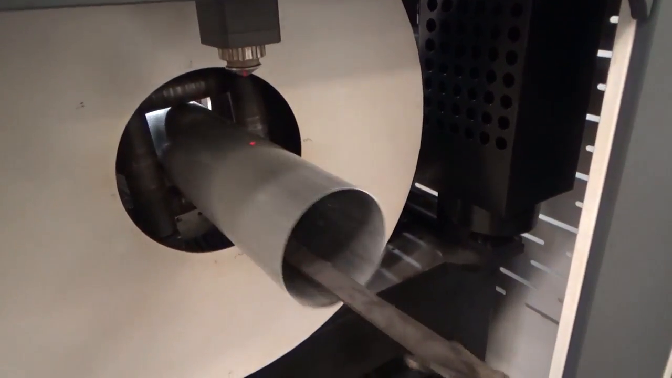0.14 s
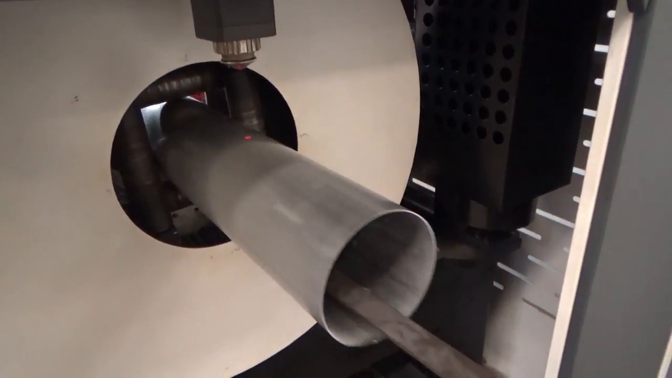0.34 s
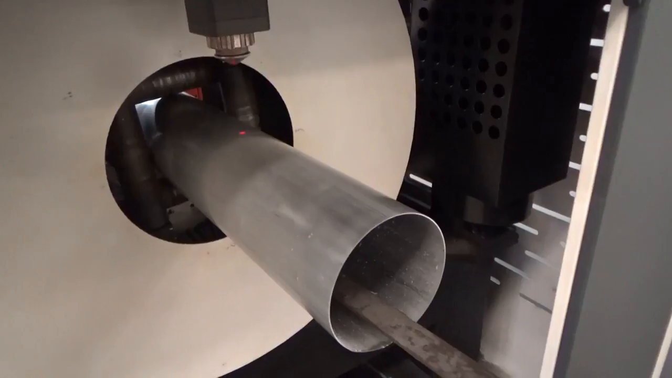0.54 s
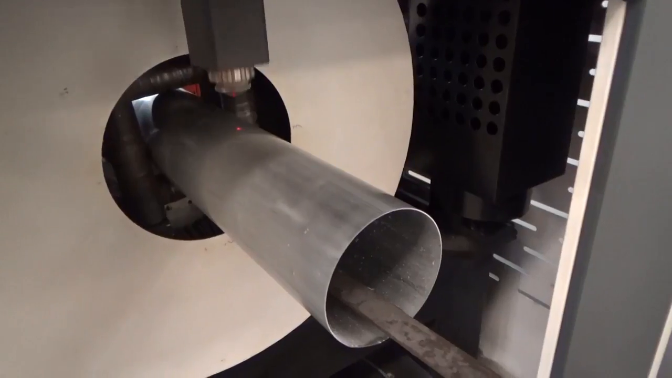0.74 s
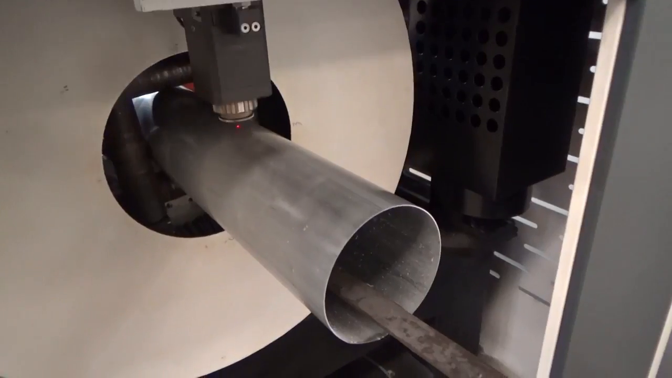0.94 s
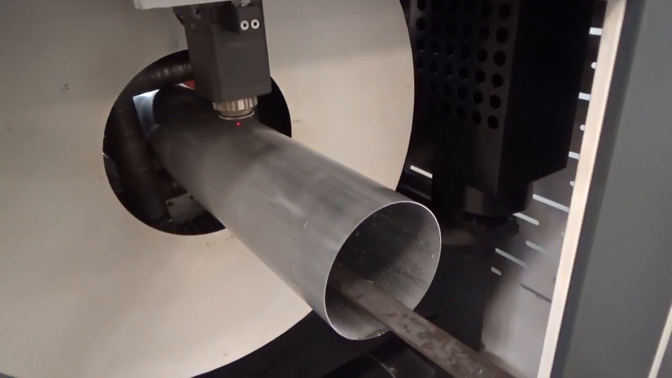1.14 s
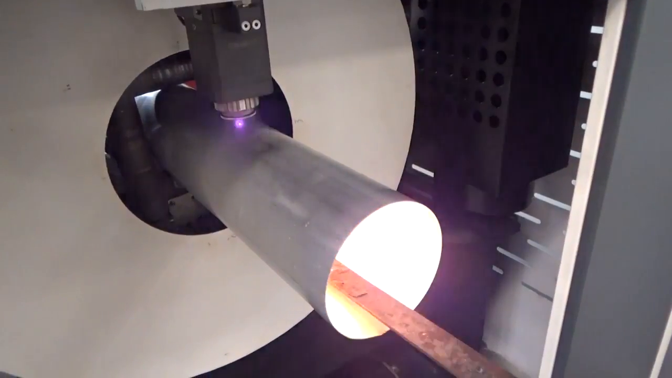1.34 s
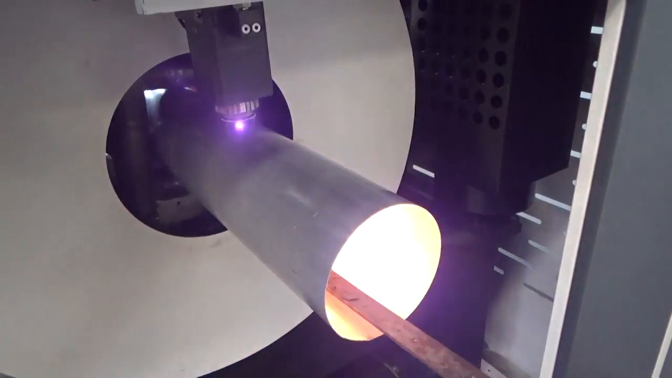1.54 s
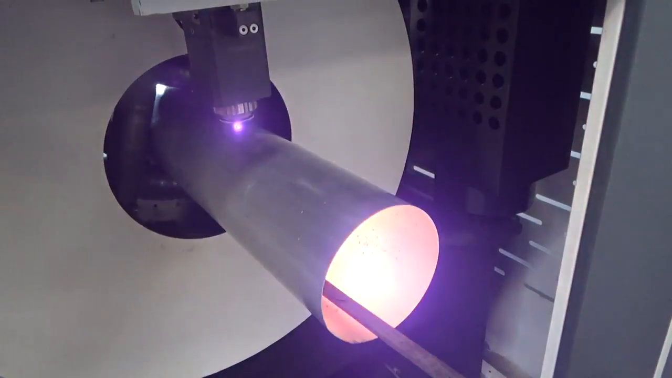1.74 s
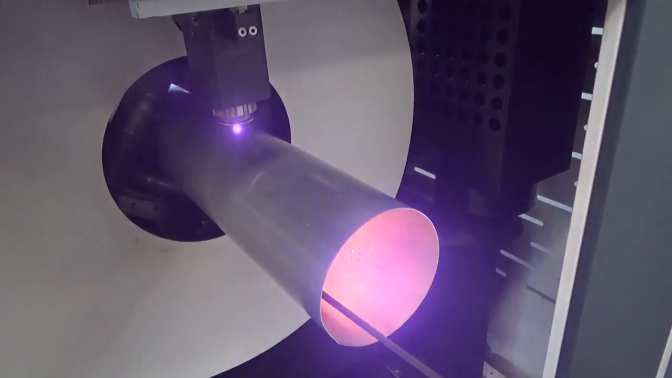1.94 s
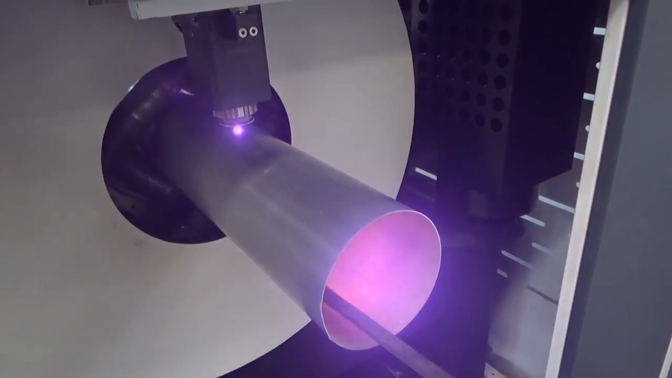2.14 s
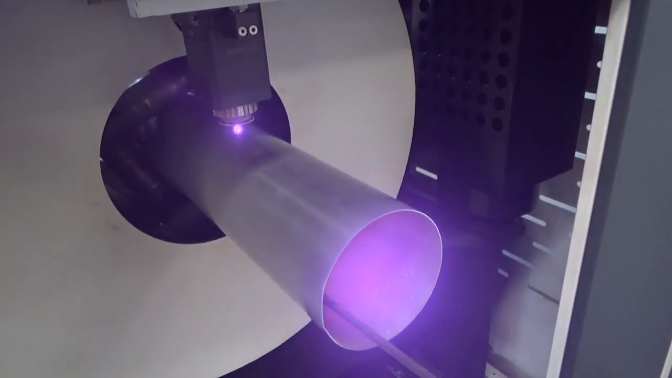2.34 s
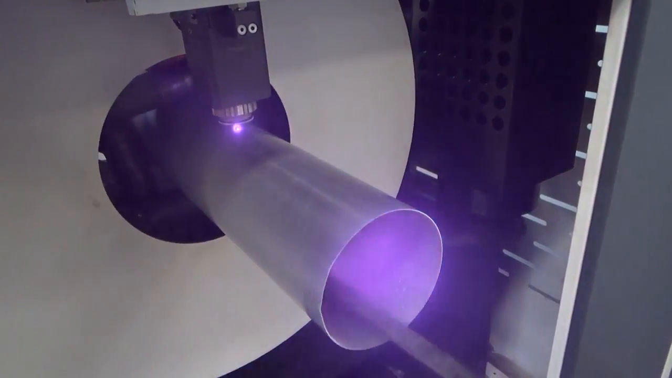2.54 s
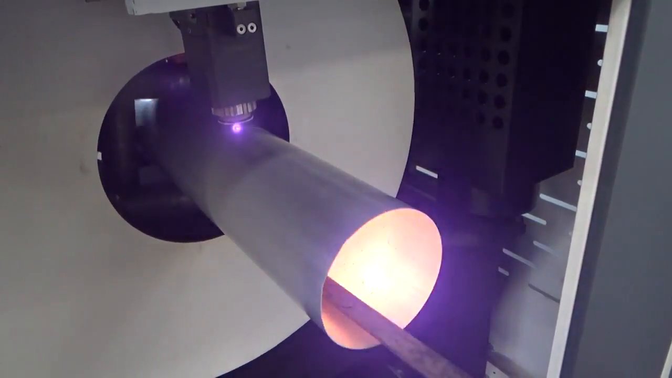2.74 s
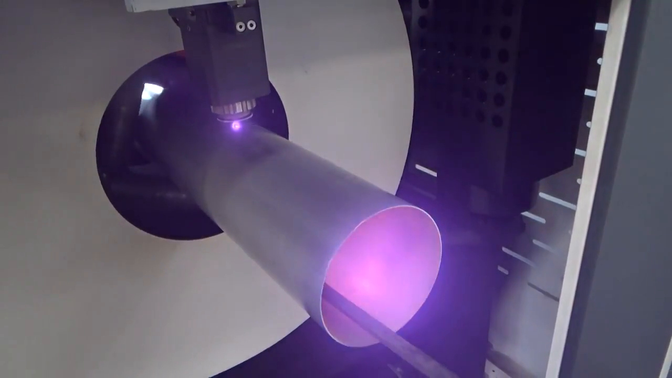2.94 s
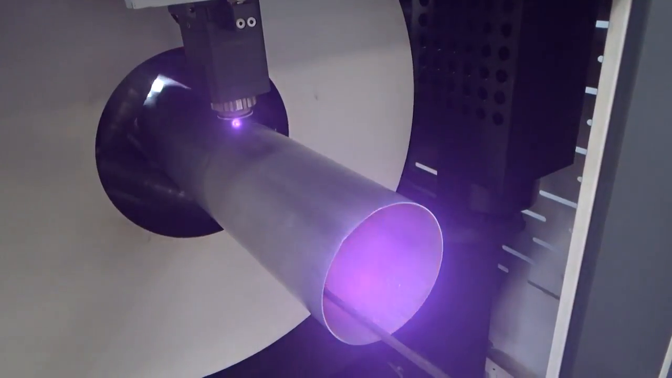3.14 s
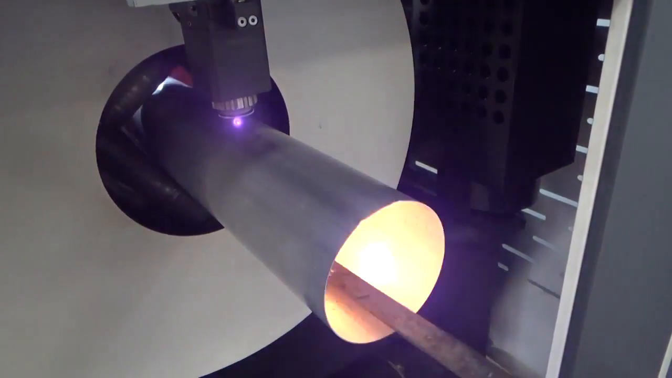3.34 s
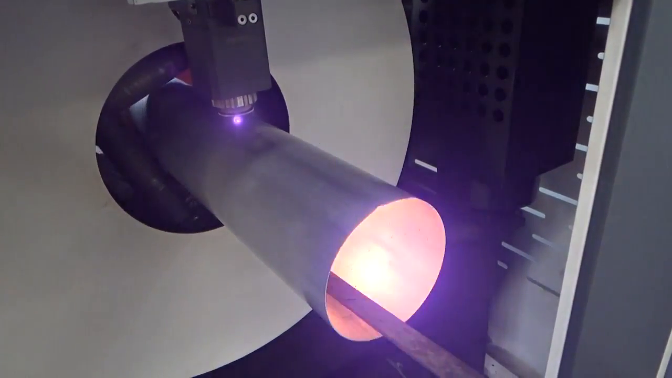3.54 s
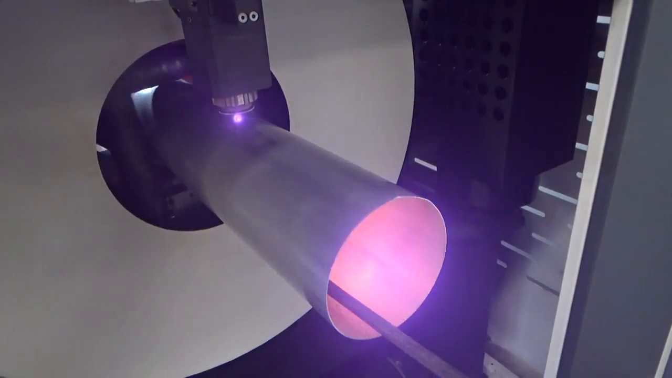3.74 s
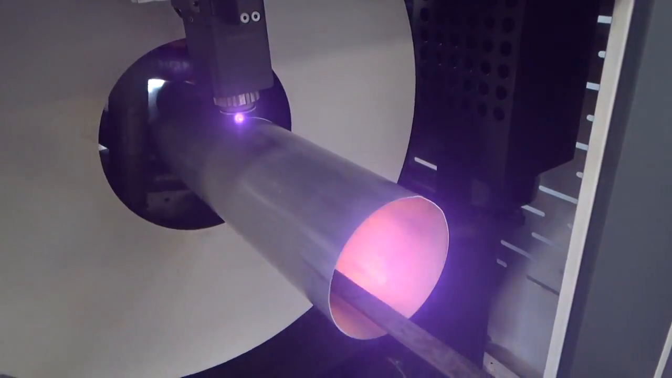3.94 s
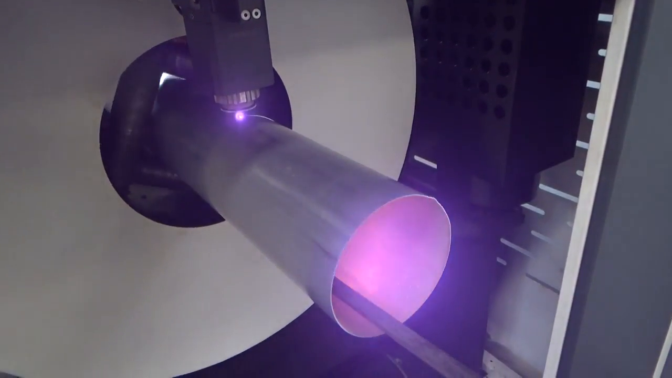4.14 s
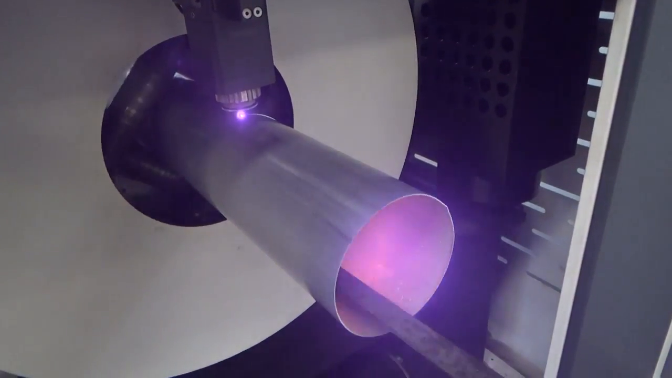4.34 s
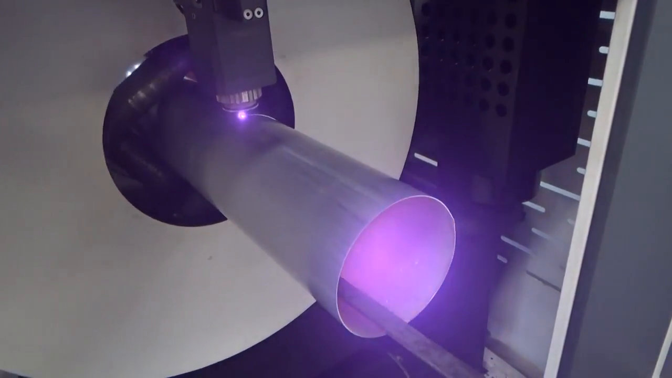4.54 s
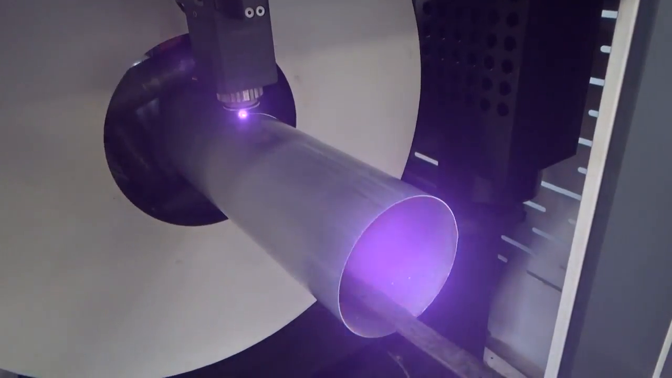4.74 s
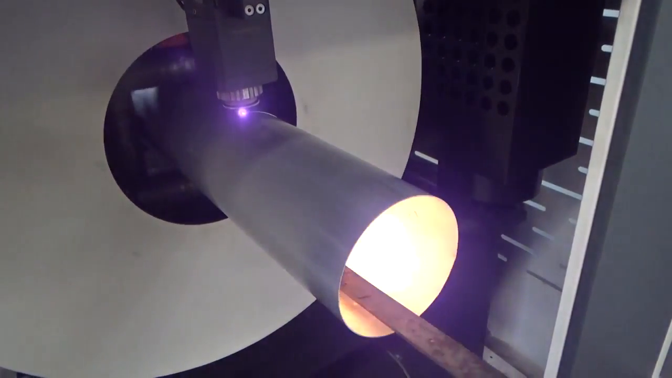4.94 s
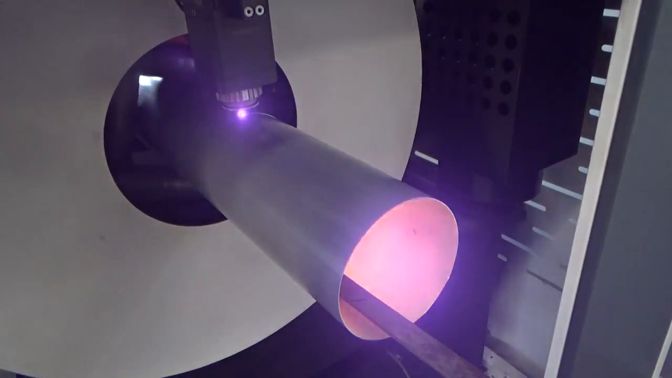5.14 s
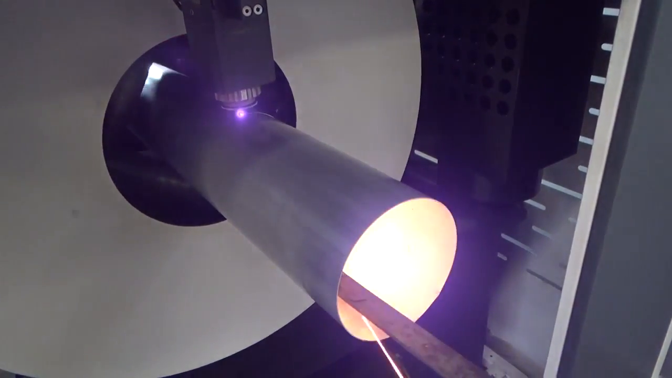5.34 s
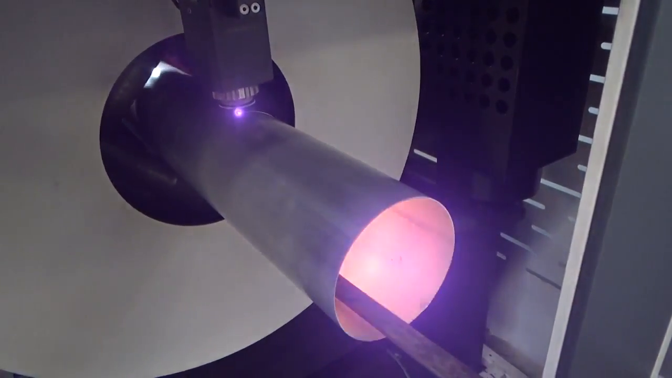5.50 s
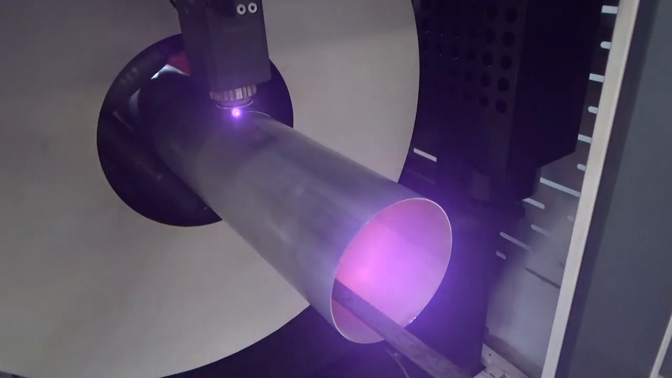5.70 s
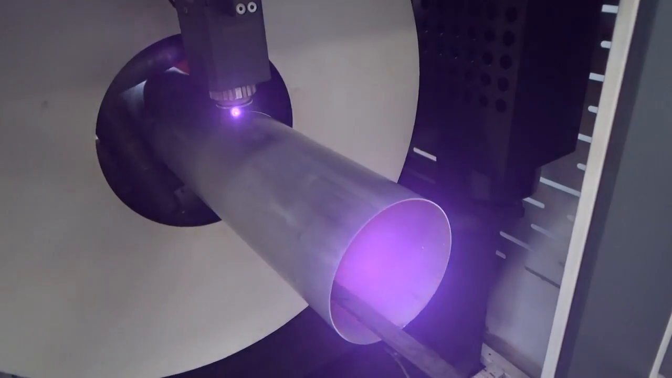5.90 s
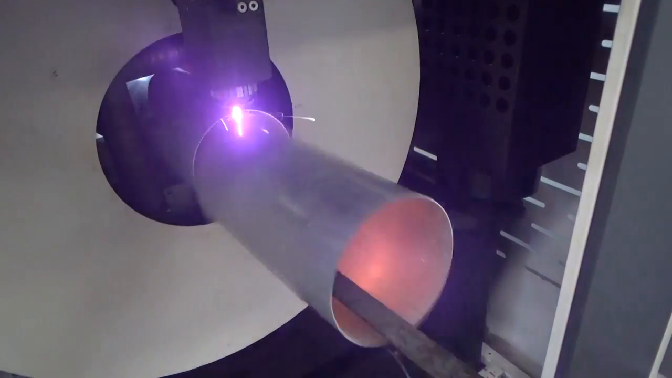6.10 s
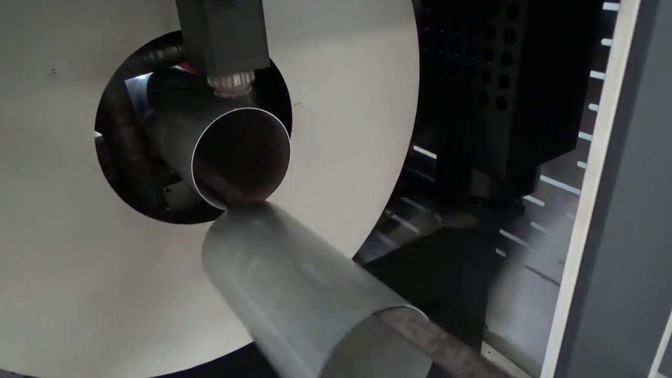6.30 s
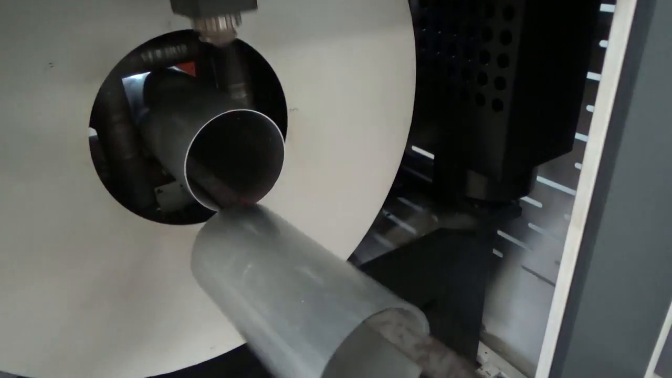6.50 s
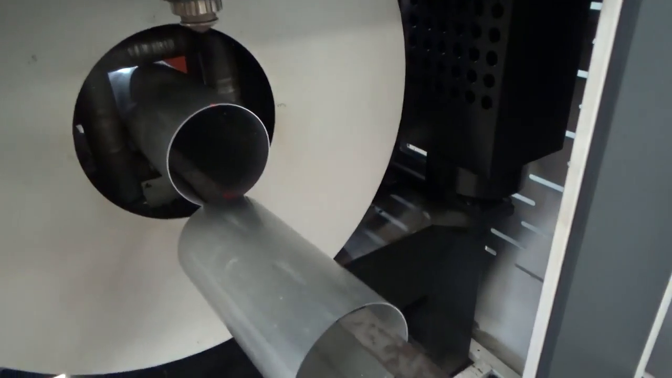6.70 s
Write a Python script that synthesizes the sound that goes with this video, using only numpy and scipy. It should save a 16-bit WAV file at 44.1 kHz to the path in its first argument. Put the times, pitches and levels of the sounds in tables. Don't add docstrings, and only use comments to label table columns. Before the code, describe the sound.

A close stereo pickup of a metal-tube cutter in a workshop. From 0 to 0.45 s, fans rumble with an unsteady low blade hum, while thin valve air, dull thumps and a faint high servo whine sound. At about 0.47 s a sharp puff and brief falling whistle lead into a hollow, resonant roar of clamp air lasting until about 1.05 s, with another puff and heavier knocks around 0.8-0.9 s. At 1.05 s the cutting gas bursts in: a bright, dense, steady hiss, finely sputtering, nearly constant to 6.1 s, the room pushed far down. Tiny squeaks near 1.5 s are almost buried. Around 6.2 s a gust and small metallic knocks mark the piece dropping and rattling. From 6.45 s airy whistles glide downward, then the gas blows across the open tube with breathy, hollow resonances until about 6.9 s.

```python
import sys
import numpy as np
from scipy import signal
from scipy.fft import rfft, irfft, next_fast_len
from scipy.io import wavfile
from scipy.ndimage import uniform_filter1d, map_coordinates

SR = 44100
rng = np.random.default_rng(int(sys.argv[2]) if len(sys.argv) > 2 else 0)


def gain_from_decibels(decibels):
    exponent = np.asarray(decibels, float) / 20
    return 10 ** exponent


def transcribe(signal):
    frames = np.atleast_2d(signal).T
    limited = np.clip(frames, -1, 1)
    pcm = np.round(limited * 32767).astype(np.int16)
    wavfile.write(sys.argv[1], SR, pcm)


N = 302526


# time_s, level_db
JET_PRESSURE = [
    (1.05, -38),
    (1.11, -20),
    (1.3, -20),
    (2.9, -20),
    (6.1, -20),
    (6.278, -19.5),
    (6.484, -19.5),
    (6.724, -27),
    (6.86, -25.5),
]
# freq_hz, level_db (per Hz)
GAS_SPECTRUM = [(290, -32), (500, -31), (658, -30.5), (771, -27.5), (891, -29), (1460, -28), (3270, -19.5),
                (4050, -19.5), (6620, -12), (7220, -12), (10200, -1), (14400, -9.5), (15800, -14)]
# freq_hz, likeness (0-1)
NEAR_LIKENESS = [(500, 1), (1500, 1), (5000, 1), (7500, .96), (10000, 0.99), (15000, 0.99)]
# freq_hz, left_over_right_db
NOZZLE_LEAN = [(5500, -2.5), (7500, 2), (10500, 3), (13000, 1.5), (15500, 1)]


def gas_jet():
    swells_db = 0.038 * wobble(5.32) + 0.15 * wobble(22.08)
    sputter_db = 0.38 * wobble(300) + 0.43 * wobble(1500)
    flicker = gain_from_decibels(swells_db + sputter_db)
    hiss = rush(shaped(GAS_SPECTRUM), NEAR_LIKENESS, (9000, 13000), patchy_db=0.0, lean=NOZZLE_LEAN)
    pressure, = gains(JET_PRESSURE)
    return pressure * flicker * hiss / np.sqrt(np.mean(flicker ** 2))


# start_s, level_db, held_s, drift_db_per_s
EXHAUST_BURSTS = [(.495, -20, 0.565, -1.4)]
# start_s, level_db, held_s, drift_db_per_s
LAST_BREATH_BURSTS = [(1.15, -48.5, 0.58, -5)]
# freq_hz, level_db (per Hz)
ROAR_SPECTRUM = [(240, -44), (400, -23), (674, -7.5), (808, -2), (915, -8), (1110, -3), (1540, -1.5),
                 (1670, 0.5), (6000, -21), (7800, -54), (13200, -120)]
# freq_hz, width_hz, level_db
FRAME_MODES = [(469, 19, 10.5), (673, 33, 6), (807, 30, 1), (928, 28, 6), (1167, 23, 0.5), (1267, 23, 0.5),
               (1442, 21, 1), (1664, 30, -14), (1810, 38, -7), (2150, 91, -8), (2430, 60, -2),
               (2990, 61, -3)]
# freq_hz, likeness (0-1)
FAR_LIKENESS = [(60, 0.95), (130, 0.96), (300, 0.91), (700, 0.64), (3000, 0.74), (7000, 0.7), (9500, 0.97),
                (11000, 1)]


def clamp_exhaust():
    escaping = bursts(EXHAUST_BURSTS, rise_db_s=450, fall_db_s=344)
    escaping += bursts(LAST_BREATH_BURSTS, rise_db_s=304, fall_db_s=55)

    def frame(hz):
        return gain_from_decibels(along(ROAR_SPECTRUM, hz)) * ringing(FRAME_MODES, hz, base_db=-6.0)

    return escaping * rush(frame, FAR_LIKENESS, (700, 3000), patchy_db=-0.2)


# start_s, level_db, held_s, drift_db_per_s
STROKE_BURSTS = [
    (.5, -27.5, 0.23, -18),
    (.91, -30.5, 0.14, 31),
]
# freq_hz, level_db (per Hz)
STROKE_SPECTRUM = [(1500, -14), (2800, 1), (4000, -4.5), (6500, -3), (10000, -9.5), (15000, -46)]


def clamp_strokes():
    moving = bursts(STROKE_BURSTS, rise_db_s=350, fall_db_s=162)
    return moving * rush(shaped(STROKE_SPECTRUM), FAR_LIKENESS, (3500, 6500), patchy_db=0.4)


# start_s, level_db, held_s, drift_db_per_s
VALVE_PUFFS = [(0, -34.5, 0.016, -60), (.235, -43, 0.057, 20), (.462, -23.5, 0.18, -94),
               (.882, -23, 0.22, -20)]
# start_s, level_db, held_s, drift_db_per_s
VALVE_LEAKS = [(0, -34, 0.416, 0), (.6, -36.5, 0.25, 0.17)]
# freq_hz, level_db (per Hz)
VALVE_SPECTRUM = [(2940, -33), (5000, -21), (6510, -6), (8560, -0.5), (9890, -1), (10900, -4.5),
                  (12200, -8), (15000, -17), (15800, -22)]


def valve():
    flow = bursts(VALVE_PUFFS, rise_db_s=900, fall_db_s=470)
    flow += bursts(VALVE_LEAKS, rise_db_s=100, fall_db_s=400)
    return flow * rush(shaped(VALVE_SPECTRUM), FAR_LIKENESS, (7500, 12000), patchy_db=0.2)


# start_s, peak_db, pitch_hz, t60_s
SEATING_THUMPS = [(0, -20, 611, 0.25), (.2, -23, 450, 0.17), (.425, -26, 230, 0.23), (.79, -27, 201, .2),
                  (.815, -21, 179, 0.22), (.825, -15, 341, .2)]


def thumps():
    return taps(SEATING_THUMPS, attack_s=0.0088)


# start_s, level_db, held_s, drift_db_per_s
RATTLE_BURSTS = [(6.222, -36.5, 0.22, -31)]
# freq_hz, level_db (per Hz)
RATTLE_SPECTRUM = [(150, -40), (250, -12), (431, -10), (519, 1), (1490, -5.5), (1960, -4), (2770, -10),
                   (3520, -8), (6000, -19), (7800, -38), (13200, -120)]
# freq_hz, width_hz, level_db
SHELL_MODES = [(720, 100, -9), (1330, 31, 0), (1760, 33, -3), (2000, 38, 2), (2410, 120, -4), (3070, 29, 1),
               (3570, 130, 2), (4130, 52, -1), (4200, 170, 0)]
# freq_hz, likeness (0-1)
BELOW_LIKENESS = [(400, 0.95), (1200, 0.92), (2500, .99)]
# start_s, peak_db, pitch_hz, t60_s
PIECE_KNOCKS = [(6.202, -28, 2870, .09), (6.212, -34, 2440, .06), (6.248, -30, 1330, 0.1),
                (6.279, -28, 3570, 0.13), (6.278, -28, 4370, .07), (6.285, -35, 2010, 0.16),
                (6.312, -33, 3070, 0.3), (6.335, -35, 3580, 0.098)]


def falling_piece():
    def shell(hz):
        return gain_from_decibels(along(RATTLE_SPECTRUM, hz)) * ringing(SHELL_MODES, hz, base_db=-7.0)

    shaking = bursts(RATTLE_BURSTS, rise_db_s=700, fall_db_s=88)
    rattle = shaking * rush(shell, BELOW_LIKENESS, (400, 1500), patchy_db=0.1)
    return rattle + taps(PIECE_KNOCKS, attack_s=0.0011)


# start_s, level_db, held_s, drift_db_per_s
PIPE_BURSTS = [(6.67, -25, .2, 4)]
# freq_hz, width_hz, level_db
PIPE_MODES = [(1036, 15, -4), (1237, 18, -5), (1410, 54, -8), (1613, 30, -6), (1820, 19, -2),
              (2000, 58, -11), (2170, 20, -4), (2395, 54, -2.5), (2650, 68, -2.5), (3050, 66, -0.5),
              (3230, 63, -1.5), (3400, 62, -0.5), (3740, 32, -2), (4060, 86, -2), (4370, 120, -1.5),
              (4610, 19, 3.5), (4930, 29, -1), (5330, 31, -7), (5750, 120, -6), (6150, 36, -4),
              (6570, 34, 1)]
# start_s, level_db, held_s, drift_db_per_s
RIM_BURSTS = [(6.544, -25.5, 0.38, -9)]
# freq_hz, level_db (per Hz)
RIM_SPECTRUM = [(3500, -36), (5500, -1.5), (7000, 1), (9000, 2), (12000, 0), (15500, -36)]
# freq_hz, likeness (0-1)
TUBE_LIKENESS = [(1000, .97), (3000, 0.98), (5000, 0.91), (8000, 0.93), (12000, .98)]


def blown_tube():
    def column(hz):
        below_pipe = 1 + (900 / (hz + 1)) ** 6
        above_pipe = 1 + (hz / 7200) ** 6
        return ringing(PIPE_MODES, hz, base_db=-19) / below_pipe / above_pipe

    pipe = bursts(PIPE_BURSTS, rise_db_s=48, fall_db_s=55)
    rim = bursts(RIM_BURSTS, rise_db_s=170, fall_db_s=55)
    return (pipe * rush(column, TUBE_LIKENESS, (1500, 4500), patchy_db=-1.0)
            + rim * rush(shaped(RIM_SPECTRUM), TUBE_LIKENESS, (5500, 8000), patchy_db=0.0))


# loudest_s, level_db, centre_hz, glide_octaves_per_s, fade_s
GAP_WHISTLES = [(6.47, -15.5, 11700, -1, 0.12), (6.49, -17, 9500, -0.19, 0.33),
                (6.51, -25, 12900, -1.1, .1), (6.53, -27, 7360, -1.3, 0.11), (6.57, -27.5, 6100, -0.47, .2),
                (.468, -18, 8700, -2, .035), (6.6, -32, 3400, -.4, 0.65)]
# loudest_s, level_db, centre_hz, glide_octaves_per_s, fade_s
PORT_CLOSING = [(1.082, -26, 5600, -1, .03)]
# loudest_s, level_db, centre_hz, glide_octaves_per_s, fade_s
BROAD_GUSTS = [(6.195, -23, 6700, -4, .05), (6.7, -31, 5500, -.4, .03), (6.225, -40, 1300, -4, 0.27),
               (.62, -22.5, 2800, 1.5, 0.23)]


def whistles():
    hz, t, noise = signal.stft(rng.standard_normal((2, N + 512)), SR, nperseg=256)
    hz = hz[:, None]
    power = 0
    for rows, breadth, rise_share in [([*GAP_WHISTLES, *PORT_CLOSING], .1, .45), (BROAD_GUSTS, .7, .4)]:
        for loudest_s, db, middle_hz, glide, fade_s in rows:
            u = (t - loudest_s) / fade_s
            centre = middle_hz * 2 ** (glide * fade_s * np.clip(u, -1, 1))
            width = breadth * centre
            level = gain_from_decibels(db - 17.5 * np.maximum(u, -u / rise_share))
            band = 1 / (1 + (2 * (hz - centre) / width) ** 2) ** 2
            band = band / (1 + (0.29 * centre / (hz + 1)) ** 4)
            power = power + level ** 2 * SR / (np.pi * width) * band
    mid, side = signal.istft(noise * np.sqrt(power), SR, nperseg=256)[1][:, :N]
    return np.array([1.2 * mid + .15 * side, 1.1 * mid - 0.14 * side])


# start_s, peak_db, pitch_hz, t60_s
CHUCK_SQUEAKS = [(1.468, -38, 803, .16), (1.536, -35, 780, 0.088), (1.613, -34, 775, .07)]
# start_s, level_db, held_s, drift_db_per_s
CHUCK_TURNING = [(2.55, -59, 0.77, -10), (3.55, -65, .3, 0), (5.5, -61, .3, 0)]


def chuck():
    motor = bursts(CHUCK_TURNING, rise_db_s=60, fall_db_s=50) * tone(757, drift=0.0062, flutter_db=3.5)
    return motor + taps(CHUCK_SQUEAKS, attack_s=0.0043)


# start_s, level_db, held_s, drift_db_per_s
SERVO_MOVING = [(.2, -46, .1, 20), (.35, -46, .14, 15)]
# start_s, level_db, held_s, drift_db_per_s
SERVO_HOLDING = [(.55, -53, 0.305, -3)]


def servo():
    moving = bursts(SERVO_MOVING, rise_db_s=280, fall_db_s=200)
    holding = bursts(SERVO_HOLDING, rise_db_s=150, fall_db_s=250)
    return (moving * tone(8005, drift=0.00018, flutter_db=1.2)
            + holding * tone(10200, drift=0.00026, flutter_db=1.6))


# time_s, gain_db
CAMERA_DUCKING = [(0, 0), (1.0, -0.5), (1.07, -3.5), (1.18, -30), (1.3, -25), (2.0, -28), (6.17, -27.5),
                  (6.26, -21.5), (6.52, -19.5), (6.68, -25), (6.86, -24.5)]
# freq_hz, level_db (per Hz)
FAN_SPECTRUM = [(15, -51), (25, -21), (55, -16), (85, -17.5), (157, -12), (300, -10.5), (400, -13),
                (603, -9.5), (922, -14.5), (2930, -23.5), (4070, -25), (7000, -32.5), (9100, -75),
                (15400, -120)]
# start_s, level_db, held_s, drift_db_per_s
BLADE_BURSTS = [(0, -29, 0.51, -9.5), (.66, -32.5, 0.041, 0), (.84, -28, .03, -40), (1.75, -30, .9, -5),
                (3.6, -35.5, 0.47, 8), (5.25, -29.5, 0.96, -2.5), (6.36, -32, .02, 0),
                (6.68, -29, 0.027, -2), (6.85, -30, .02, 2)]


def fans():
    duck, = gains(CAMERA_DUCKING)
    rumble = gain_from_decibels(-33.5) * rush(shaped(FAN_SPECTRUM), FAR_LIKENESS, (60, 300), patchy_db=0.64)
    blade = bursts(BLADE_BURSTS, rise_db_s=70, fall_db_s=78) * tone(338, drift=0.0041, flutter_db=1.9)
    return duck * (rumble + blade * gain_from_decibels([[1.5], [-1.5]]))


def along(points, hz):
    f, v = np.transpose(points)
    return np.interp(np.log(hz + 1), np.log(f + 1), v)


def gains(rows, fade=.02):
    s, *cols = np.transpose(rows)
    s = np.r_[s[0] - fade, s, s[-1] + fade]
    return [gain_from_decibels(np.interp(np.arange(N) / SR, s, np.r_[-110, c, -110])) for c in cols]


def bursts(rows, rise_db_s, fall_db_s):
    start, db, held, drift = np.transpose(rows)[:, :, None]
    t = np.arange(0, N + 64, 32) / SR
    u = t - start
    rise = rise_db_s * np.minimum(u, 0)
    hold = drift * np.clip(u, 0, held)
    fall = fall_db_s * np.maximum(u - held, 0)
    level = gain_from_decibels(db + rise + hold - fall)
    return np.interp(np.arange(N) / SR, t, np.sqrt(np.sum(level ** 2, axis=0)))


def wobble(rate):
    return map_coordinates(rng.standard_normal(int(N * rate / SR) + 4), [np.arange(N) * rate / SR])


def tone(hz, drift, flutter_db):
    phase = 2 * np.pi * np.cumsum(hz * (1 + drift * wobble(4))) / SR
    return np.sqrt(2) * gain_from_decibels(flutter_db * wobble(36)) * np.sin(phase)


def taps(rows, attack_s):
    out, t = np.zeros(N + SR), np.arange(SR // 4) / SR
    for start_s, db, hz, t60 in rows:
        breath = 0.54 * rng.standard_normal(len(t)) * gain_from_decibels(-60 * t / .02)
        note = np.sin(2 * np.pi * hz * t) + breath
        out[round(start_s * SR):][:len(t)] += gain_from_decibels(db - 60 * t / t60) * (1 - np.exp(-t / attack_s)) * note
    return out[:N]


def ringing(modes, hz, base_db):
    peaks = sum(gain_from_decibels(db) ** 2 / (1 + (2 * (hz - c) / w) ** 2) for c, w, db in modes)
    return np.sqrt(peaks + gain_from_decibels(base_db) ** 2)


def shaped(spectrum):
    return lambda hz: gain_from_decibels(along(spectrum, hz)) * np.minimum(1, hz / spectrum[0][0]) ** 2


def rush(colour, alike, band, patchy_db, lean=((1, 0), (2, 0))):
    z = signal.stft(rng.standard_normal((2, N + 1024)), nperseg=512)[2]

    def patches(bins, frames):
        rough = rng.standard_normal(z.shape[1:])
        smooth = uniform_filter1d(uniform_filter1d(rough, bins, 0), frames, 1)
        return smooth / smooth.std()

    field_db = patchy_db * patches(24, 4) + 1.15 * patches(2, 5)
    pair = signal.istft(z * gain_from_decibels(field_db), nperseg=512)[1]
    m = next_fast_len(N + 8192)
    hz = np.fft.rfftfreq(m, 1 / SR)
    turn = np.arccos(np.clip(along(alike, hz), -1, 1)) / 2
    mid, side = rfft(pair, m) * colour(hz) * [np.cos(turn), np.sin(turn)]
    inside = irfft(mid * (hz > band[0]) * (hz < band[1]), m)[:N]
    tilt = gain_from_decibels(along(lean, hz) / 2)
    return irfft([(mid + side) * tilt, (mid - side) / tilt], m)[:, :N] / inside.std()


def scene():
    clamp = clamp_exhaust() + clamp_strokes() + valve() + thumps()
    tube = falling_piece() + blown_tube()
    return gas_jet() + clamp + tube + whistles() + chuck() + servo() + fans()


def low_pass(x):
    return signal.sosfilt(signal.butter(12, 15900, fs=SR, output="sos"), x)


def record(dry):
    below_limit = np.fft.rfftfreq(N, 1 / SR) < 15770
    kept = irfft(rfft(dry) * below_limit, N)
    return low_pass(kept)


dry = scene()
out = record(dry)
transcribe(out)
```